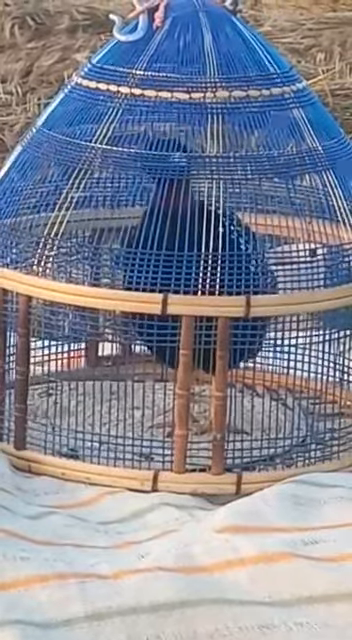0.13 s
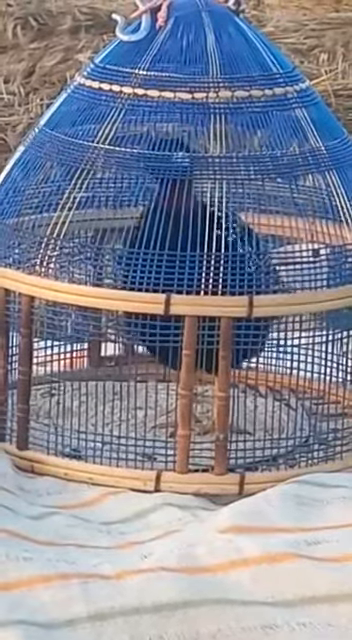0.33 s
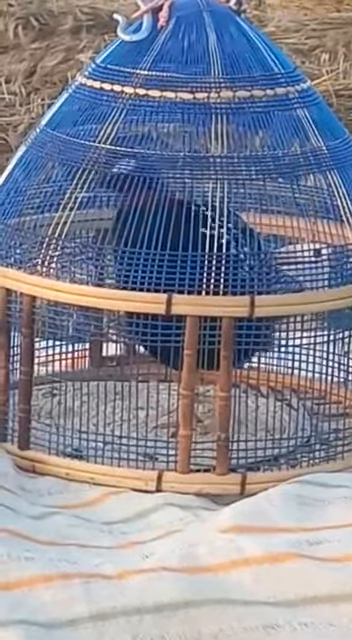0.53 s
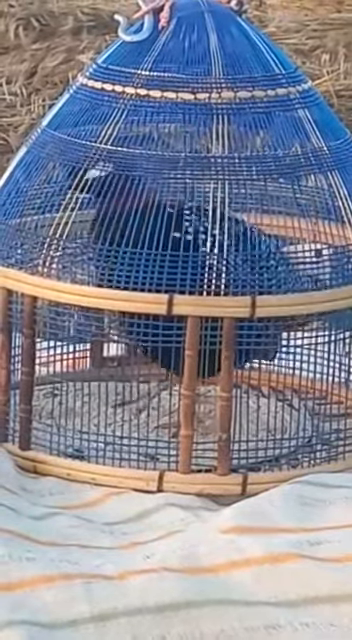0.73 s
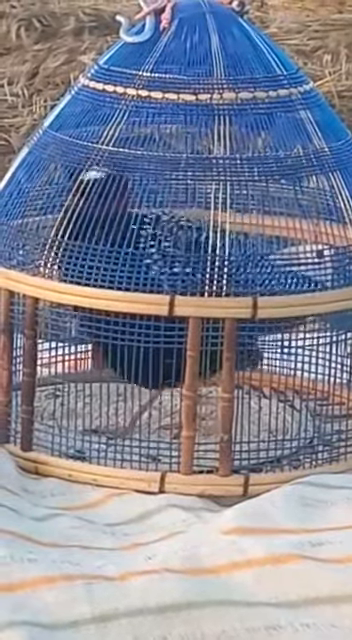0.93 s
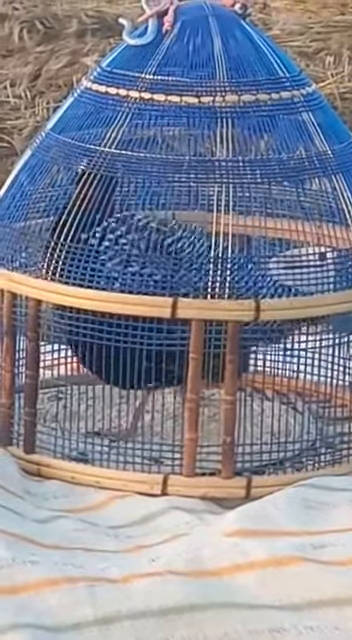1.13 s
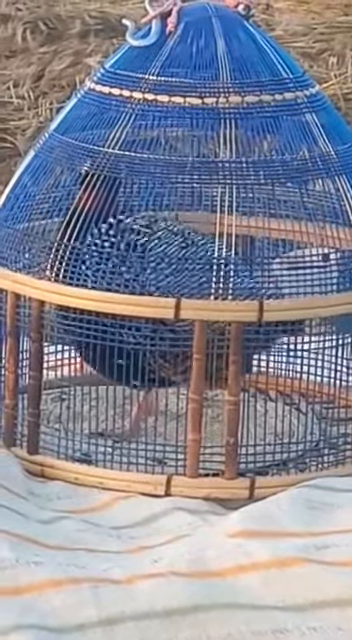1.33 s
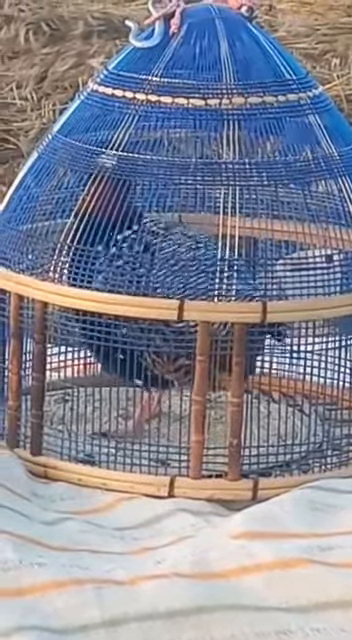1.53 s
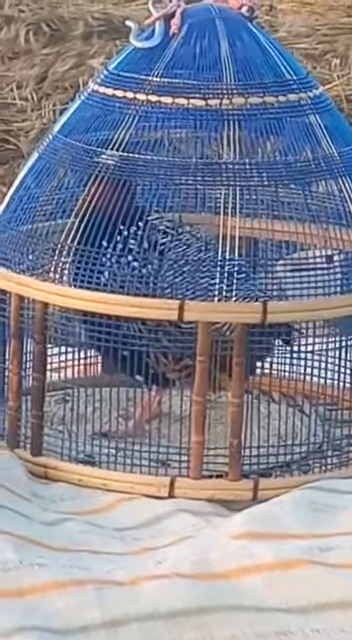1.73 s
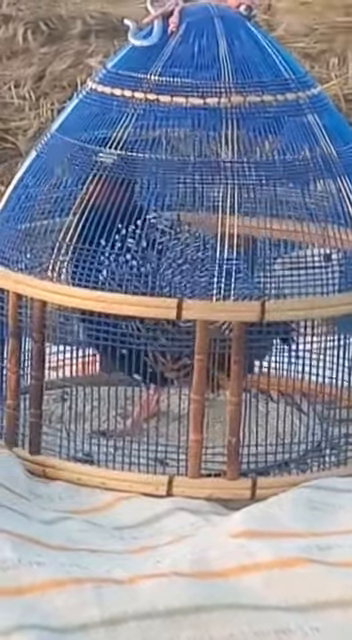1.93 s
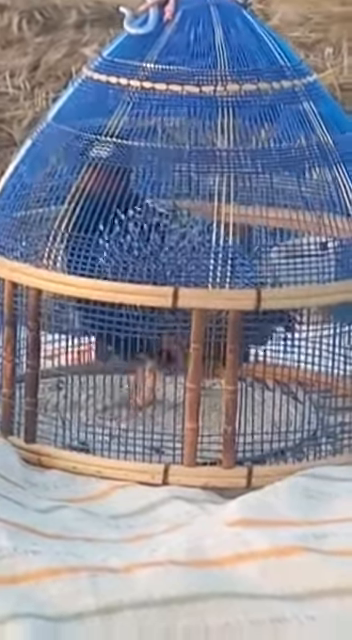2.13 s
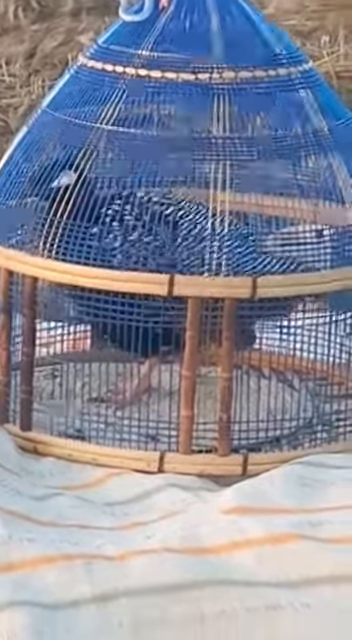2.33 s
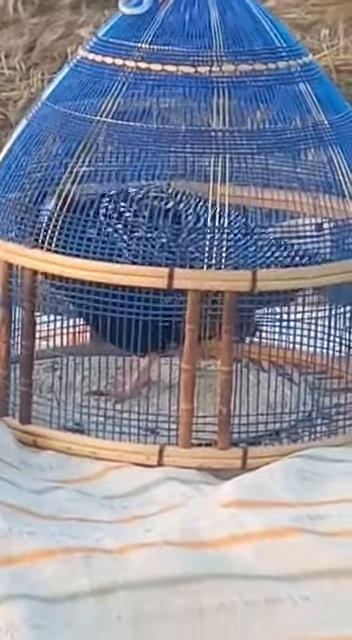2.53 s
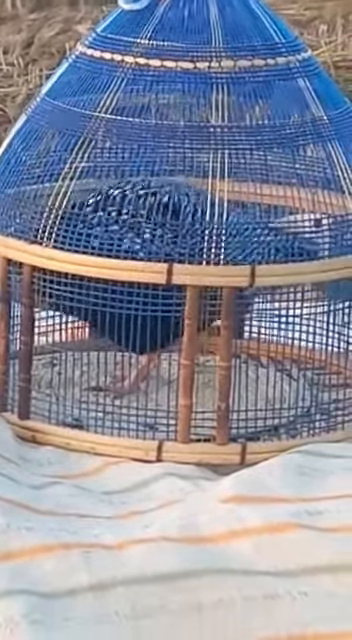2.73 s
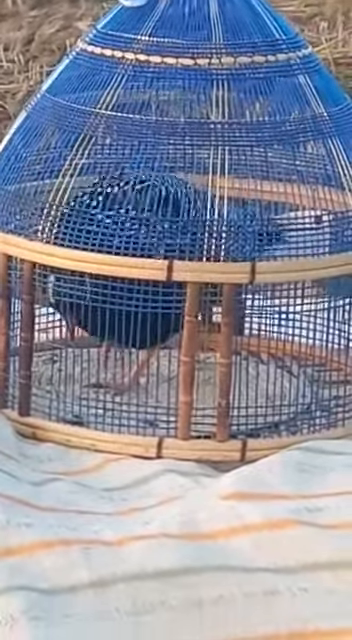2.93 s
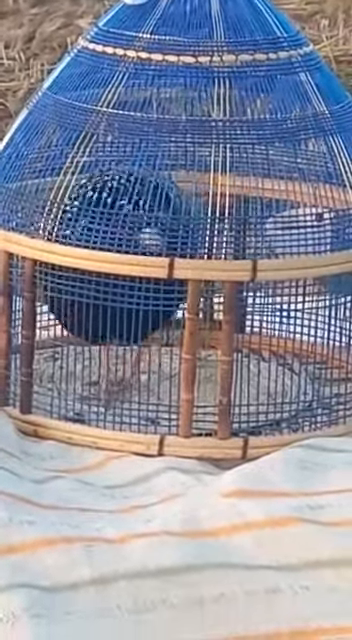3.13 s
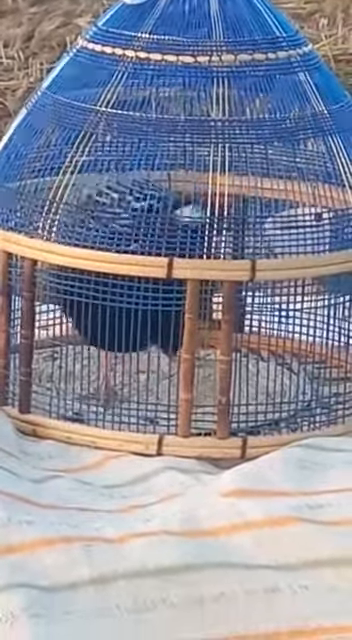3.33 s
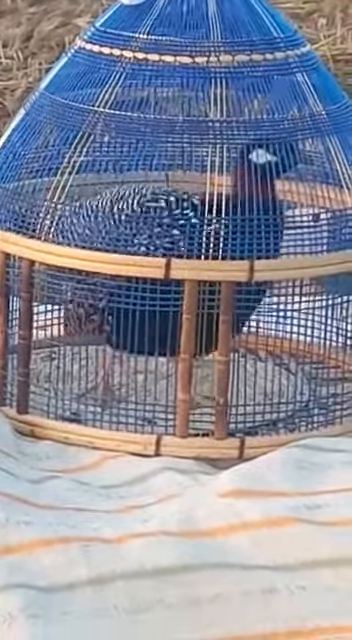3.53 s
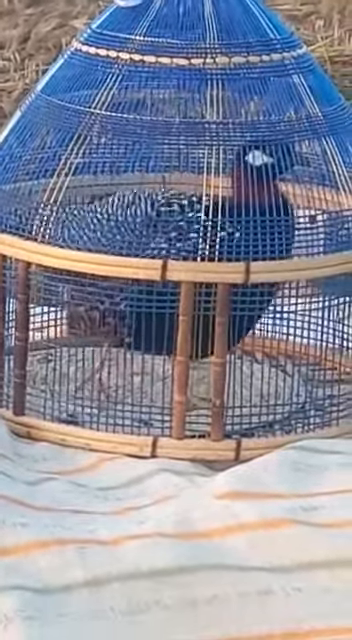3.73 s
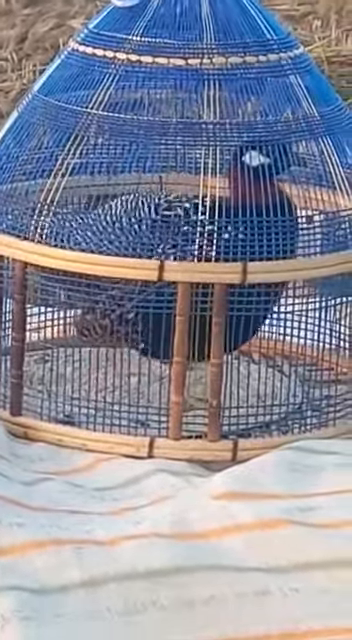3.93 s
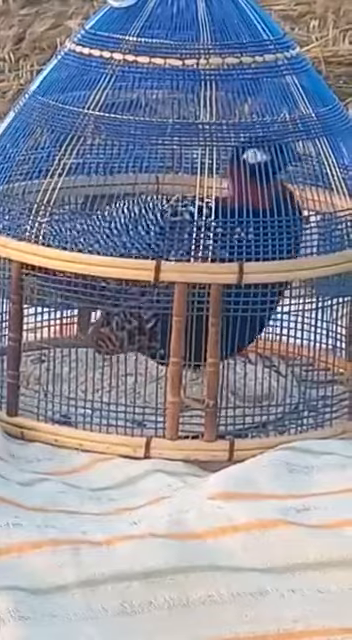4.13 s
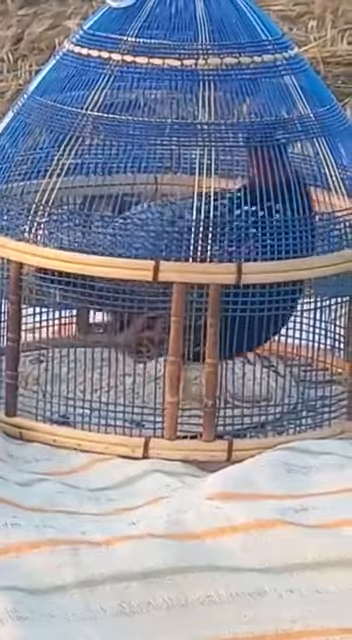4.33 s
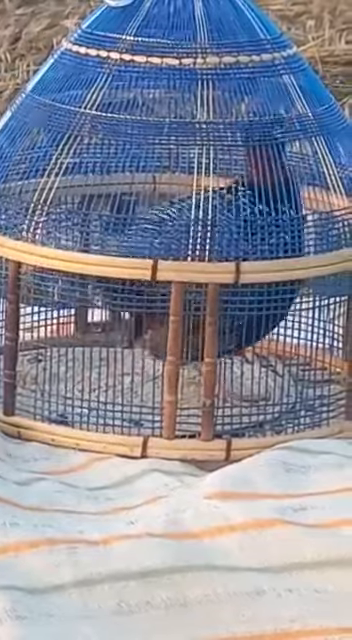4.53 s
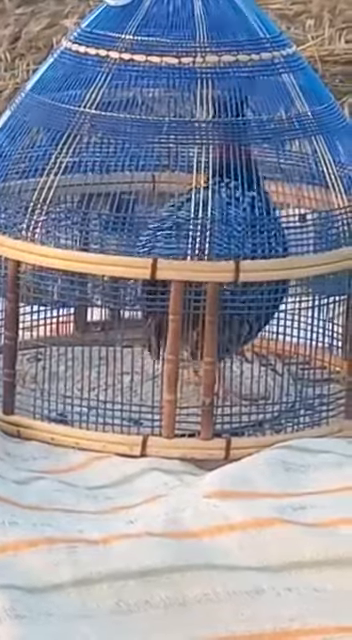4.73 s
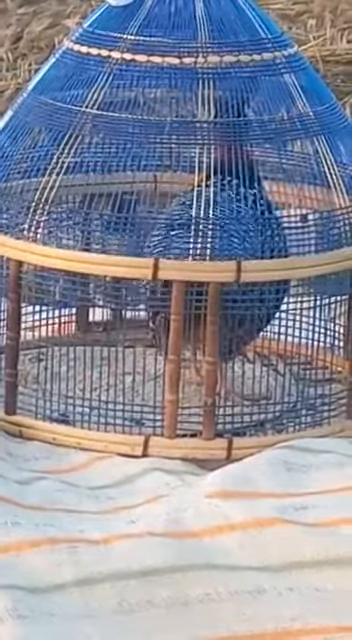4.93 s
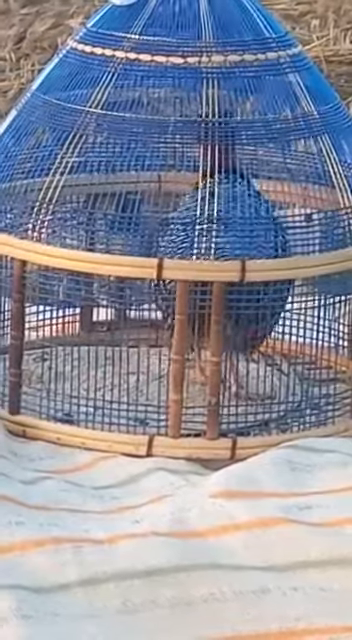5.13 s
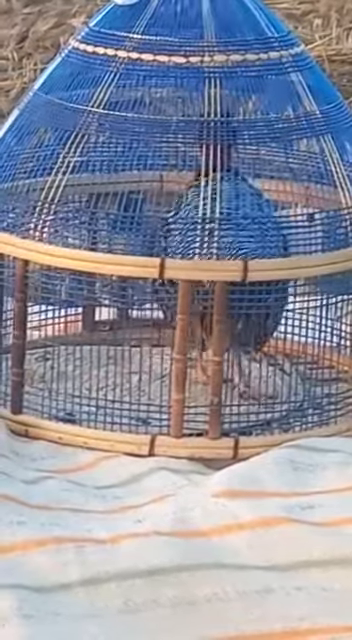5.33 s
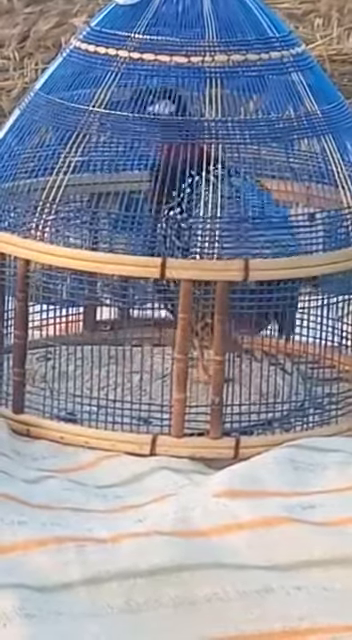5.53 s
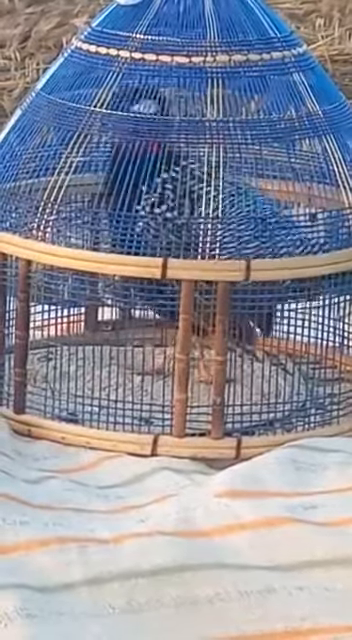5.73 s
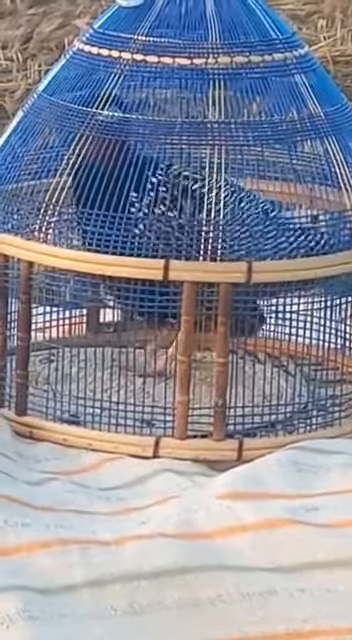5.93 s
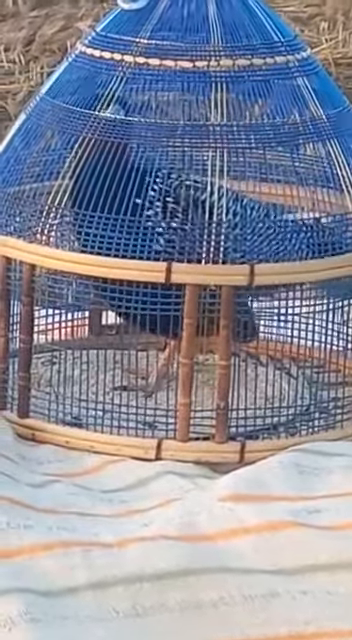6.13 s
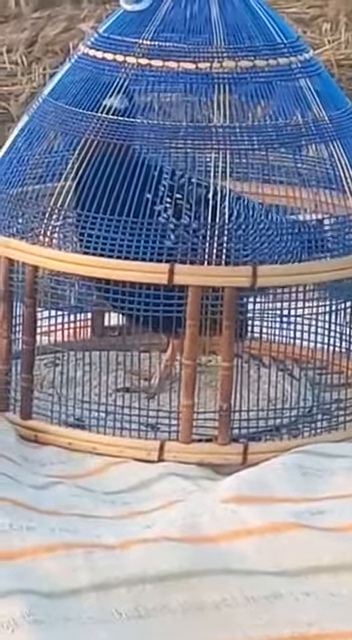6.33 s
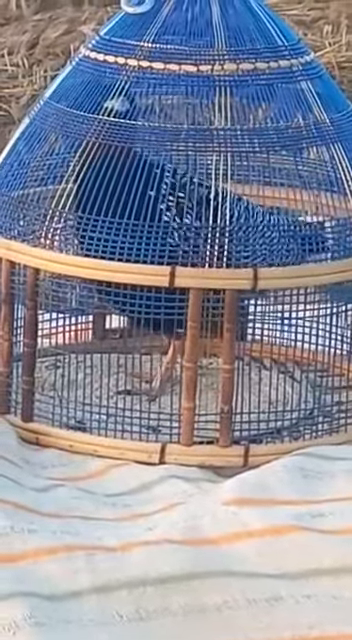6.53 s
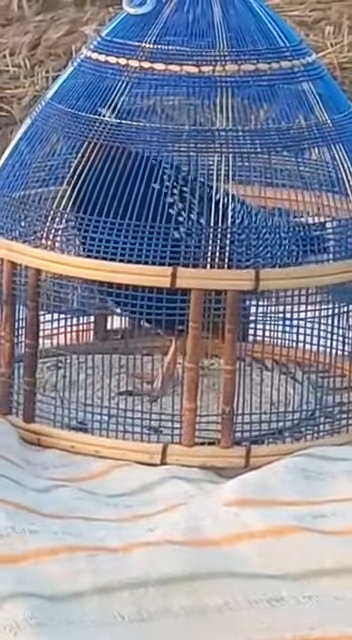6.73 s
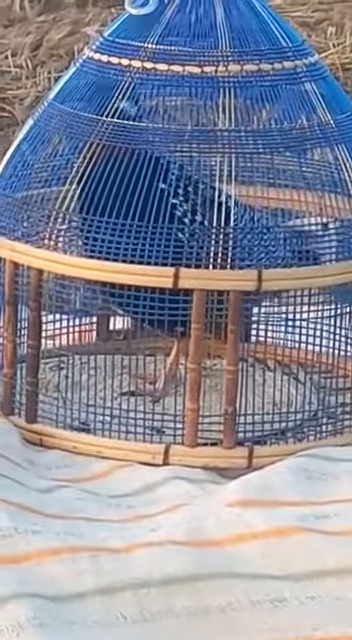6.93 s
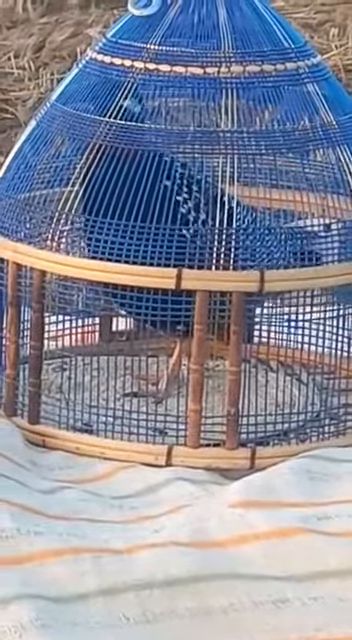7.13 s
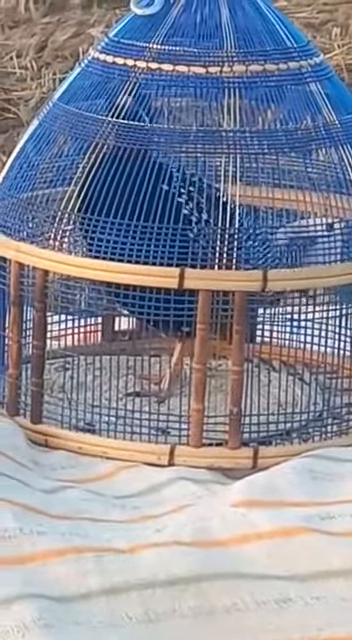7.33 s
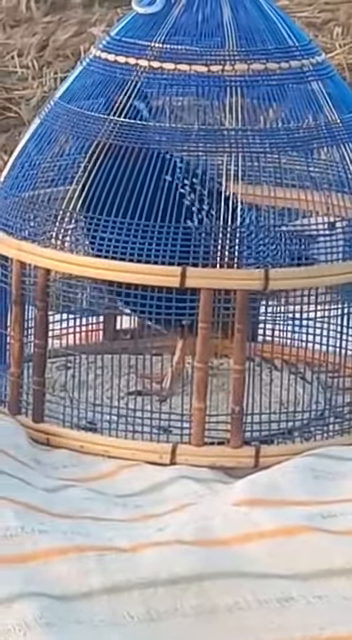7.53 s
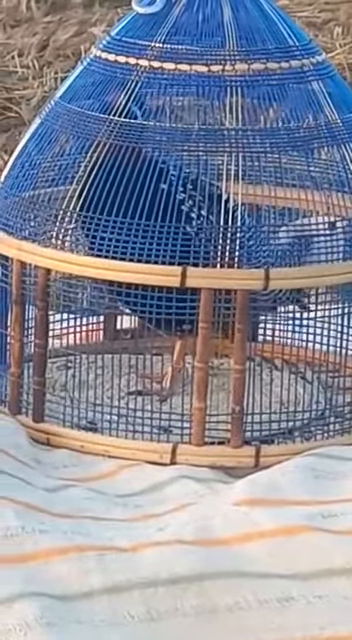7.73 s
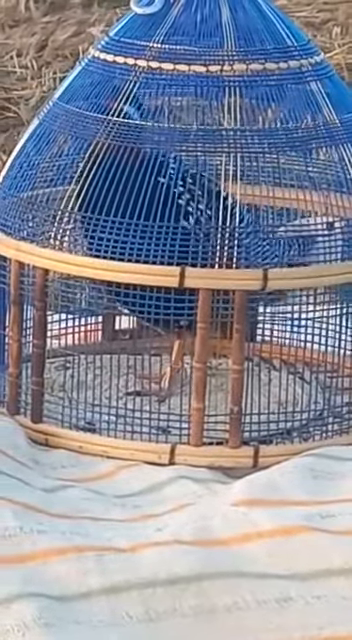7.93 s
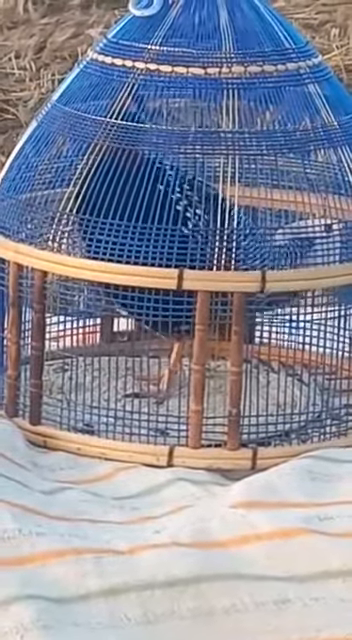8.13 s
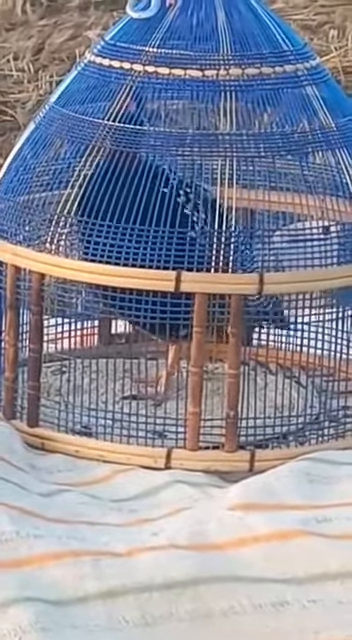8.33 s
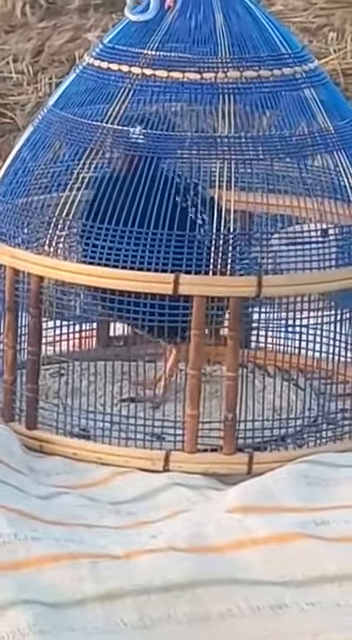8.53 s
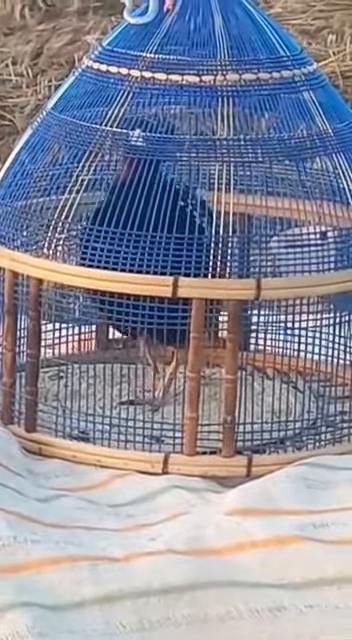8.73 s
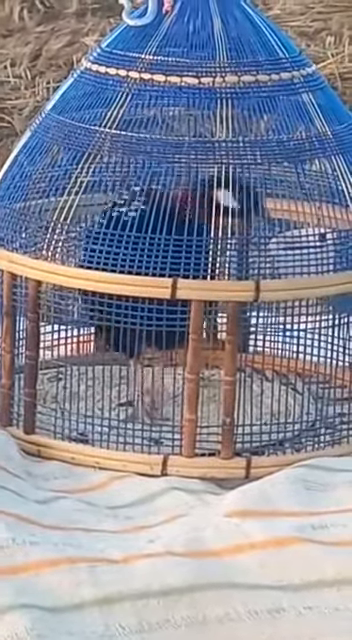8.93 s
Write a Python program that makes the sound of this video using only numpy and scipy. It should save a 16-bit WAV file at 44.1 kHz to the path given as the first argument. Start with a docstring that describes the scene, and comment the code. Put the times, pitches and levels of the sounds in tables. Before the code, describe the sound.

Falling runs of sharp pips from a rival bird to the left, then loud grating rasps from a caged francolin close by outdoors.

```python
"""Two francolins in a field

Close by in a wicker cage, one francolin squeaks and rasps: a whistle trilled some 280 times a second.
Off to the left its rival gives three runs of falling pips, each pip a whistle whose pitch collapses.
Behind them a crow caws hoarsely, a small warbler repeats short falling notes, and faint birds glide and hoot.
Shaped noise makes a light wind rumble and a distant wash. Table levels are at the source, before echoes."""
import sys
import numpy as np
from scipy import signal
from scipy.fft import rfft, irfft
from scipy.io import wavfile

SR = 44100
rng = np.random.default_rng(int(sys.argv[2]) if len(sys.argv) > 2 else 0)


def master_out(mix):
    """Clip the mix to full scale and print it as 16-bit PCM to the path in sys.argv[1]."""
    frames = np.transpose(np.atleast_2d(mix))
    ceiling = np.clip(frames, -1, 1)
    pcm = np.round(ceiling * 32767).astype(np.int16)
    wavfile.write(sys.argv[1], SR, pcm)


N = 400428
TIME, BINS = np.arange(N) / SR, np.fft.rfftfreq(N, 1 / SR)  # sample times [s], spectrum frequencies [Hz]


def amp(db):
    """Decibels to gain."""
    return 10 ** (np.asarray(db) / 20)


def unit(x):
    """Scales a sound to rms 1."""
    return x / np.sqrt(np.mean(x ** 2) + 1e-20)


def read(points, hz):
    """Reads a spectrum table at the given frequencies, along a log-frequency axis."""
    f, value = np.transpose(points)
    return np.interp(np.log(hz + 1), np.log(f + 1), value)


def follow(rows):
    """Sample times over a table's span, then each further column joined by straight lines."""
    s, *columns = np.transpose(rows)
    t = np.arange(s[0], s[-1], 1 / SR)
    return [t] + [np.interp(t, s, column) for column in columns]


def add(mix, s, sound):
    """Mixes a sound in at s seconds."""
    part = mix[max(round(s * SR), 0):][:len(sound)]
    part += sound[:len(part)]


def sine(hz):
    """A pure tone that follows a moving pitch."""
    return np.sin(2 * np.pi * np.cumsum(hz) / SR)


def wander(t, per_s):
    """A smooth random drift, one value for each t; a larger per_s makes it quicker."""
    size = 2 ** 15
    smoothing = 1 + (np.fft.rfftfreq(size, 1 / SR) / per_s) ** 2
    drift = unit(irfft(rfft(rng.standard_normal(size)) / smoothing))
    return drift[np.arange(len(t)) % size]


def syrinx(hz, slope_db, shrill_db=0):
    """Voice box: harmonics of a moving pitch, changing by slope_db an octave; shrill_db acts above the second."""
    phase = 2 * np.pi * np.cumsum(hz) / SR
    voice = 0
    for k in range(1, 9):
        level_db = slope_db * np.log2(k) + shrill_db * np.clip(k / 2 - 1, 0, 1)
        voice = voice + amp(level_db) * (k * hz < SR / 2) * np.sin(k * phase)
    return voice


# squeaks, where a call over-tightens into a thin whistle and chokes:
# (time [s], length [s], level [dB])
SQUEAK_ROWS = [(6.8175, .0246, -11.5), (7.7545, .027, -22), (8.293, .017, -23)]
SQUEAK_HZ, PINCH_S = 6740, .003  # pitch, time to pinch shut or open
CHOKE_S, CHOKE_DB = .015, -22  # time and depth of the choke
CREAK_HZ, CREAK_DB, CREAK_S = 1350, -20, .004  # slack voice: pitch, relative level, time it lingers around a call
ARCH, SWING_HZ = .16, 1420  # share by which pitch sags at both ends of a call; widest swing of the trill


def rasp_course(start, length, db, top_hz, tighten, slacken, rate, hurry):
    """Tension rises and falls; pitch, level, swing and trill speed follow it, unless a squeak takes over."""
    t = np.arange(start - CREAK_S, start + length + CREAK_S, 1 / SR)
    u = np.clip((t - start) / length, 0, 1)
    tightening = 1 - np.exp(-u * length / tighten)
    slackening = 1 - np.exp(-(1 - u) * length / slacken)
    tension = tightening * slackening
    arched_hz = top_hz * (1 - ARCH * (2 * u - 1) ** 2)
    hz = CREAK_HZ + (arched_hz - CREAK_HZ) * tension
    swing_hz = SWING_HZ * np.interp(hz, [CREAK_HZ, 4400], [0, 1])
    outside_s = abs(t - start - u * length)
    level_db = db + CREAK_DB * (1 - tension) - 18 * outside_s / CREAK_S
    rates = rate * (1 + hurry * np.minimum(1 - hz / top_hz, .35))
    for s, held, squeak_db in SQUEAK_ROWS:
        pinch = np.clip(np.minimum(t - s, s + held - t) / PINCH_S + .5, 0, 1)
        choked_db = squeak_db + CHOKE_DB * np.clip((t - s) / CHOKE_S, 0, 1) ** 2
        hz = hz + pinch * (SQUEAK_HZ - hz)
        swing_hz = swing_hz * (1 - pinch)
        level_db = level_db + pinch * (choked_db - level_db)
    return t, level_db, hz, swing_hz, rates


# harsh calls: (time [s], length [s], level [dB], pitch aimed at [Hz], tightening [s], slackening [s],
# trill when tight [cycles per s], hurry of the trill when slack [share])
RASP_ROWS = [(6.8112, .0393, -7, 4700, .0018, .003, 290, .5), (6.854, .014, -17, 1550, .002, .005, 290, .5),
             (7.237, .017, -39, 1400, .002, .002, 290, .5),
             (7.2505, .158, -11.2, 4900, .004, .008, 288, .05),
             (7.6005, .216, -13.4, 4620, .012, .014, 285, .8),
             (8.062, .092, -13, 4500, .009, .009, 252, .9),
             (8.2175, .206, -13.4, 4400, .007, .018, 260, .9)]
# untrilled chip that opens the outburst and collapses: (time [s], level [dB], pitch [Hz])
CHIP_COURSE = [(6.779, -45, 3700), (6.788, -14, 4000), (6.793, -14, 3600), (6.796, -10.5, 2400),
               (6.801, -25, 1450), (6.811, -36, 1350)]


def rasps(slope_db=-9, jitter=.026, rough=0.03, slack_rough=.06, flutter_db=1.0, puff_db=-22, breath_db=-34):
    """A slow membrane swings the whistle's pitch up and down; at low tension the voice turns ragged."""
    out = np.zeros(N)
    chip = (*follow(CHIP_COURSE), 0, 0)  # no swing, no trill
    for t, db, centre_hz, swing_hz, rate in [chip] + [rasp_course(*row) for row in RASP_ROWS]:
        trilling = swing_hz / SWING_HZ
        creak = np.interp(centre_hz, [1500, 3000], [1, 0])  # slack membranes slap shut: strong overtones
        slack = np.interp(centre_hz, [3300, 4500], [1, 0]) * np.maximum(trilling, creak)
        uneven_rate = rate * (1 + jitter * (1 + 2 * slack) * wander(t, 200))
        cycle = 2 * np.pi * np.cumsum(uneven_rate) / SR
        swing = np.sin(cycle + 0.23 * np.sin(cycle))  # the pitch rises faster than it falls
        shake = (0.0045 + rough * trilling + slack_rough * slack) * wander(t, 920)
        hz = (centre_hz + swing_hz * swing) * (1 + shake)
        # while it trills, the whistle cannot drop under the windpipe's first resonance
        hz = np.maximum(hz, 2880 * np.minimum(1.4 * trilling, 1))
        beat_db = flutter_db * trilling * wander(t, 400) - 2 * trilling * np.cos(cycle)
        voice = syrinx(hz, slope_db + 5 * creak) * amp(beat_db)
        # each swing also lets out a weak puff of air, and the flow hisses
        gusts = signal.lfilter([.6], [1, -.9], rng.standard_normal(len(t)))
        puffs = trilling * np.cos(cycle) + (1 + trilling * np.cos(cycle)) * gusts
        flow = signal.lfilter([1], [1, -.6], rng.standard_normal(len(t)))
        add(out, t[0], amp(db) * (voice + amp(puff_db) * puffs + amp(breath_db) * flow))
    return out


# low two-part whines: (time [s], level [dB])
WHINE_ROWS = [(6.336, -62.5), (6.568, -61), (7.022, -69), (7.495, -78)]
# course of a whine: (time from its start [s], pitch [Hz], added level [dB])
WHINE_COURSE = [(0, 3866, -21), (.01, 3850, 4), (.028, 3404, -5.5), (.036, 2827, -6.5), (.055, 2560, 4),
                (.09, 2500, 9), (.115, 2566, -18)]


def whines():
    """A short upper note steps down to a held lower one."""
    out = np.zeros(N)
    for s, db in WHINE_ROWS:
        t, hz, shape_db = follow(WHINE_COURSE)
        add(out, s, amp(db + shape_db) * syrinx(hz * (1 + 0.013 * wander(t, 300)), slope_db=-19.5))
    return out


# course of a pip, before stretching: (time from the collapse [s], pitch factor [ratio], added level [dB])
PIP_COURSE = [(-.046, 0.67, -31.5), (-.039, 1.07, -14), (-.026, 1.04, 3), (-.017, 1.012, 4.2),
              (-.004, .978, 2.2), (-.0005, .84, -6.5), (.002, .79, -1), (.008, .77, -6),
              (0.012, .68, -25.5)]
# the same columns for the tired, arched pips that end a run
LAST_PIP_COURSE = [(-.042, 0.78, -22), (-.034, .92, -9), (-.022, 1.01, 1.5), (-.013, 1.005, 7),
                   (-.005, .99, 9.5), (.002, .89, 4.5), (.007, .83, 7), (0.015, .77, -15.5),
                   (0.025, 0.88, -20.5)]


def pips(rows, slope_db, rough, tail_db=-3.5, waver_db=1.28, hiss_db=-15, burst_db=7):
    """Each pip sags in pitch, then collapses roughly to a lower register; the lowest ones are arched."""
    out, previous = np.zeros(N), -np.inf
    for s, db, hz, overtone_db in rows:
        tired = np.interp(hz, [2500, 2750], [1, 0])
        course = tired * np.array(LAST_PIP_COURSE) + (1 - tired) * np.array(PIP_COURSE)
        # high pips and those after a rest are drawn out
        rested = np.interp(s - previous, [.25, 1], [1, 1.36])
        stretch = rested * np.interp(hz, [2880, 3000], [1, 1.12])
        t, bend, shape_db = follow(course * [stretch, 1, 1])
        broken = np.interp(bend, [.85, .97], [1, 0])
        shake = (0.0007 + rough * broken) * wander(t, 620)
        # overtones come in only once the note is under way; the highest pips are the most strained
        onset_db = np.interp(t, [-.04, -.028], [-5, 0])
        bright_db = slope_db + overtone_db + tail_db * broken + onset_db
        shrill_db = np.interp(hz, [2700, 2980], [-3, 13]) * (1 - broken) + 3 * broken
        note = syrinx(hz * bend * (1 + shake), bright_db, shrill_db)
        # the air hisses faintly, more so as the pitch gives way
        hiss = signal.lfilter([.9], [1, -.15], rng.standard_normal(len(t)))
        note += amp(hiss_db + overtone_db + burst_db * broken) * hiss
        add(out, s + t[0], amp(db + shape_db + waver_db * wander(t, 63)) * note)
        previous = s
    return out


# faint peeps: (time of the collapse [s], level [dB], pitch [Hz], overtone slope [dB per octave])
PEEP_ROWS = [(2.93, -75, 3470, -2.5), (4.05, -77, 3430, -6), (5.745, -73, 3500, -8)]


def peeps():
    """The caged bird's faint peeps break in pitch just as pips do."""
    return pips(PEEP_ROWS, slope_db=0, rough=0.024)


# course that all runs share, before its ends are pulled toward each run's own pitches:
# (pip number [count], pitch [Hz], added level [dB], overtone slope [dB per octave])
RUN_COURSE = [(0, 2995, -3.5, -19.5), (1, 3010, .5, -18), (3, 2905, 0, -17.5), (7, 2770, -.7, -16),
              (10, 2708, .7, -15.5), (12, 2655, -.5, -15.5), (15, 2430, -3.8, -28)]
PIP_COUNT = 16
SETTLE_PIPS, TIRE_PIPS, SLOW_PIPS = 2.5, 1.1, .62  # pips over which a run finds its pitch, tires, and slows


def run_of_pips(start, spacing, delay, db, swell_db, first_hz, last_hz, last_overtone_db):
    """Evenly spaced pips sink in pitch and the last come late: rows of time, level, pitch, overtone slope."""
    k = np.arange(PIP_COUNT)
    number, *columns = np.transpose(RUN_COURSE)
    hz, shape_db, overtone_db = (np.interp(k, number, c) for c in columns)
    left = k[::-1]  # pips still to come
    fresh, tired = np.exp(-k / SETTLE_PIPS), np.exp(-left / TIRE_PIPS)
    times = start + spacing * k + delay * np.exp(-left / SLOW_PIPS)
    levels = db + swell_db * k + shape_db
    pitches = hz + (first_hz - hz[0]) * fresh + (last_hz - hz[-1]) * tired
    return np.transpose([times, levels, pitches, overtone_db + last_overtone_db * np.sqrt(tired)])


# runs of pips: (time of the first collapse before any delay [s], spacing [s], delay of the last [s],
# level [dB], swell [dB per pip], pull of the first pip to a pitch [Hz], pull of the last to a pitch [Hz],
# overtone slope added to the last [dB per octave])
RUN_ROWS = [(.3825, .0768, .057, -38.2, .17, 3045, 2422, -9),
            (4.311, .0766, .009, -29.1, -.07, 2965, 2520, 4),
            (7.679, .0758, .026, -33.6, -.33, 2940, 2270, 1)]


def rival_pips():
    """The rival's voice: all its runs of pips in turn."""
    return pips(np.vstack([run_of_pips(*row) for row in RUN_ROWS]), slope_db=4, rough=0.035)


# windpipe and open beak: (frequency [Hz], level [dB])
THROAT_SPECTRUM = [(120, -41), (200, -25), (450, -26), (1000, -24.5), (1400, -16), (1900, -17.5),
                   (2350, -13.5), (2750, 1), (3200, -1.8), (4200, -2.5), (5100, -3), (5900, 3.5), (6800, 0),
                   (8400, -13.5), (10300, -9), (12000, -11.5), (14000, -9), (15800, -16)]


def throat(x, ring_hz=6750, width_hz=260, ring_db=-3):
    """Windpipe and beak colour the voice; a narrow resonance rings on when a harmonic sweeps through it."""
    x = irfft(rfft(x) * amp(read(THROAT_SPECTRUM, BINS)), N)
    return x + amp(ring_db) * signal.lfilter(*signal.iirpeak(ring_hz, ring_hz / width_hz, SR), x)


# echoes of the cage floor, hoops and ground: (delay [ms], gain before the bounce setting [ratio])
ECHO_ROWS = [(.86, 0.16), (1.68, 0.077), (2.15, 0.28), (2.9, 0.13), (3.47, 0.22), (9.5, 0.07), (16, .05)]


def cage(x, bounce, scatter_db):
    """A few distinct echoes, plus a fine scatter off the wicker that differs for each port."""
    echoes = sum(gain * np.exp(-2j * np.pi * BINS * ms / 1000) for ms, gain in ECHO_ROWS)
    t = np.arange(SR // 60) / SR
    wicker = rng.standard_normal((2, len(t))) * np.exp(-t / 0.0017) * (t > .0004)
    wicker *= amp(scatter_db) / np.linalg.norm(wicker[0])
    scatter = rfft(wicker, N) * np.minimum(BINS / 5000, 2)  # stronger at high pitch
    return irfft(rfft(x) * (1 + bounce * echoes + scatter), N)


# soft whistles between calls: (time [s], length [s], level [dB], start pitch [Hz], end pitch [Hz])
MURMUR_ROWS = [(2.314, 0.017, -56, 5200, 3180), (2.385, 0.07, -70, 3000, 2810),
               (2.44, .13, -74.5, 2600, 1990), (2.686, 0.16, -76, 2330, 1880),
               (2.956, 0.054, -76, 4400, 4120), (3.02, 0.13, -72, 2600, 1947),
               (3.275, 0.06, -73.5, 2920, 3040), (3.425, .15, -75.5, 2470, 1900),
               (3.646, 0.11, -74.5, 2550, 1980), (3.76, 0.086, -72.5, 2450, 2530),
               (3.943, 0.079, -72, 2250, 2080), (5.92, 0.09, -68, 3150, 2500),
               (5.997, 0.079, -74, 2000, 1500)]


def murmurs():
    """Thin whistles that slide toward a final pitch and level out."""
    out = np.zeros(N)
    for s, length, db, start_hz, end_hz in MURMUR_ROWS:
        u = np.arange(0, 1, 1 / (length * SR))
        slide_hz = end_hz + (start_hz - end_hz) * np.exp(-(u / 0.36) ** 2)
        whistle = sine(slide_hz * (1 + .006 * wander(u, 450)))
        add(out, s, amp(db) * signal.windows.tukey(len(u), .4) * whistle)
    return out


# scuffs of the feet on the cage floor: (time [s], length [s], level [dB])
SCUFF_ROWS = [(2.265, 0.036, -65), (4.13, 0.012, -66), (5.637, 0.03, -78), (6.665, 0.0088, -79)]


def scuffs():
    """Short bursts of spiky noise, kept to a middle band."""
    out = np.zeros(N)
    band = signal.butter(2, [2800, 5500], "band", fs=SR, output="sos")
    for s, length, db in SCUFF_ROWS:
        grit = rng.standard_normal(round(length * SR)) ** 3
        add(out, s, amp(db) * unit(signal.sosfilt(band, grit * np.hanning(len(grit)))))
    return out


# crow: (time [s], length [s], level [dB])
CAW_ROWS = [(1.052, 0.31, -57), (2.068, 0.31, -56), (3.96, .29, -55.5), (5.076, 0.3, -53.5)]


def crow(pitch_hz=590, throb_hz=73, beak_hz=1750, width_hz=430):
    """A hoarse, throbbing stack of harmonics under one throat resonance."""
    out = np.zeros(N)
    for s, length, db in CAW_ROWS:
        u = np.arange(0, 1, 1 / (length * SR))
        throb = np.sin(2 * np.pi * throb_hz * length * u + .25 * wander(u, 30))
        hz = pitch_hz * (1 - .3 * (u - .42) ** 2) * (1 + 0.073 * throb + 0.045 * wander(u, 630))
        phase = 2 * np.pi * np.cumsum(hz) / SR
        caw = sum(np.sin(k * phase) / (1 + ((k * hz - beak_hz) / width_hz * 2) ** 2) for k in range(1, 9))
        add(out, s, amp(db) * unit(caw * amp(2 * throb)) * signal.windows.tukey(len(u), .55))
    return out


def phrase(start, db, count=6, gap=.0375, top_hz=5170, fall_hz=430, sink=.0028, fade_db=1.1, uneven_db=2):
    """A string of short falling notes that swell, sink and fade: gives (time, sound) for each."""
    u = np.linspace(0, 1, 1200)
    for k in range(count):
        hz = (top_hz - fall_hz * u ** 2) * (1 - sink * (k - 1) ** 2 + .006 * rng.standard_normal())
        note_db = db - fade_db * (k - 1.7) ** 2 + uneven_db * rng.standard_normal()
        yield start + k * gap, amp(note_db) * np.sin(np.pi * u) * sine(hz)


PHRASE_START_S, PHRASE_EVERY_S = 1.616, .3562  # the warbler's steady beat
PHRASE_DB, PHRASE_FADE_DB = -68.5, -.28  # level of the first phrase; change from one phrase to the next


def warbler(count=16):
    """One phrase repeated on a steady beat, slowly fading."""
    out = np.zeros(N)
    for k in range(count):
        for s, note in phrase(PHRASE_START_S + k * PHRASE_EVERY_S, PHRASE_DB + k * PHRASE_FADE_DB):
            add(out, s, note)
    return out


# far drawn-out hoots: (time [s], length [s], level [dB], pitch [Hz])
HOOT_ROWS = [(0.04, 0.62, -67.5, 1099), (2.701, 0.8, -71, 1236)]


def hoots():
    """Faint wavering hoots from far off, each a pure tone that swells and fades."""
    out = np.zeros(N)
    for s, length, db, hz in HOOT_ROWS:
        u = np.arange(0, 1, 1 / (length * SR))
        add(out, s, amp(db) * np.hanning(len(u)) * sine(hz * (1 + 0.034 * wander(u, 120))))
    return out


def chorus(level_db=-80.5, count=70):
    """Many far birds: faint downward glides at random pitches and moments."""
    out = np.zeros(N)
    for when, pitch, length, glide in rng.random((count, 4)):
        u = np.arange(0, 1, 1 / ((0.027 + 0.14 * length) * SR))
        hz = 2100 * 2 ** (.9 * pitch ** 2 + (-.1 - 0.14 * glide) * u)
        add(out, 1.4 + 5.8 * when, amp(level_db - 4 * pitch) * np.hanning(len(u)) * sine(hz))
    return out


# colour of the air noise: (frequency [Hz], relative level per Hz [dB])
AIR_SPECTRUM = [(15, -58.5), (25, -31), (38, -20), (52, -3), (110, 1), (246, -12.5), (1020, -21),
                (1240, -19), (2300, -26.5), (2560, -23), (3200, -29), (4260, -28), (5010, -25.5),
                (5730, -34), (6920, -33), (7500, -39.5), (15500, -38)]
# left-right likeness of the air noise: (frequency [Hz], correlation [-1 to 1])
AIR_LIKENESS = [(60, 0.91), (180, 0.86), (550, 0.2), (1650, -0.3), (4970, -0.78), (15000, 0.76)]
# strength of the wind rumble: (time [s], level [dB])
WIND_LEVELS = [(0.0, -78), (2.02, -67), (3.44, -71), (4.32, -64), (6.17, -69), (6.75, -65), (9.03, -76),
               (9.08, -70)]
# strength of the distant wash, before wash_db: (time [s], level [dB])
WASH_LEVELS = [(.8, -76), (1.3, -70), (3.5, -71.5), (4.8, -67.5), (5.8, -71.5), (8.5, -75), (9.08, -82)]


def air(wash_db):
    """Gusty rumble below, a smooth distant wash above, both partly shared by the two ports."""
    a, b = rfft(rng.standard_normal((2, N)))
    same = np.clip(read(AIR_LIKENESS, BINS), -1, 1)
    noise = np.array([a, same * a + np.sqrt(1 - same ** 2) * b]) * amp(read(AIR_SPECTRUM, BINS))
    low = 1 / (1 + (BINS / 250) ** 4)
    wind = unit(irfft(noise * low, N)) * amp(np.interp(TIME, *np.transpose(WIND_LEVELS)))
    wash = unit(irfft(noise * (1 - low), N)) * amp(wash_db + np.interp(TIME, *np.transpose(WASH_LEVELS)))
    return (wind + wash) * amp([[1], [-1]])  # a little stronger on the left


# slow part of the field's dying away: (frequency [Hz], time to fall by 60 dB [s])
FIELD_DECAY = [(500, .25), (2700, 0.21), (6000, 0.24), (14000, 0.17)]


def field(x, wet_db):
    """Scatter from stubble and bushes: sparse taps, each band dying at its own speed."""
    taps = rng.standard_normal((2, SR // 2)) * (rng.random((2, SR // 2)) < .08)
    taps[:, :SR // 250] = 0  # nothing returns in the first 4 ms
    hz, t, z = signal.stft(taps, SR, nperseg=256)
    decay = amp(-60 * t / read(FIELD_DECAY, hz)[:, None]) + 1.9 * amp(-60 * t / 0.044)  # slow and quick parts
    tail = signal.istft(z * decay, SR, nperseg=256)[1]
    return amp(wet_db) * signal.fftconvolve(x[None], tail / np.linalg.norm(tail[0]), axes=1)[:, :N]


def place(x, left_db, lead_ms, wet_db):
    """A source reaches the left port first, then the field answers; left_db is left minus right."""
    ports = irfft(rfft(x) * np.exp(-2j * np.pi * BINS * np.array([[0], [lead_ms]]) / 1000), N)
    return (ports + field(ports[0], wet_db)) * amp(np.array([[.5], [-.5]]) * left_db)


# balance of the caged bird as it turns: (time [s], left minus right [dB])
FACING_COURSE = [(4, 3), (6.8, 1.5), (7.3, -3.5), (8.3, -2.5)]


def scene():
    """The caged francolin rasps close by as it turns; its rival pips from the left; the field sounds behind."""
    caged = cage(throat(rasps() + peeps() + whines()), bounce=1.29, scatter_db=-9)
    rival = cage(throat(rival_pips()), bounce=.3, scatter_db=-18.5)
    facing_db = np.interp(TIME, *np.transpose(FACING_COURSE))
    mix = place(caged, facing_db, lead_ms=0.052, wet_db=-27.5)
    mix += place(rival, left_db=4, lead_ms=0.045, wet_db=-10)
    mix += place(murmurs() + scuffs() + chorus(), left_db=3, lead_ms=0.065, wet_db=-1.5)
    mix += place(crow() + hoots(), left_db=3, lead_ms=0.12, wet_db=-6)
    mix += place(warbler(), left_db=-4.5, lead_ms=0.018, wet_db=-6.5)
    return mix + air(wash_db=-1.6)


EDGE_HZ = 15900  # upper edge of the recorder's band


def record(dry):
    """The recorder's band limit: a steep low-pass filter."""
    lowpass = signal.firwin(511, EDGE_HZ, window=("kaiser", 9), fs=SR)
    return signal.oaconvolve(dry, lowpass[None], "same")


dry = scene()
out = record(dry)
master_out(out)
```